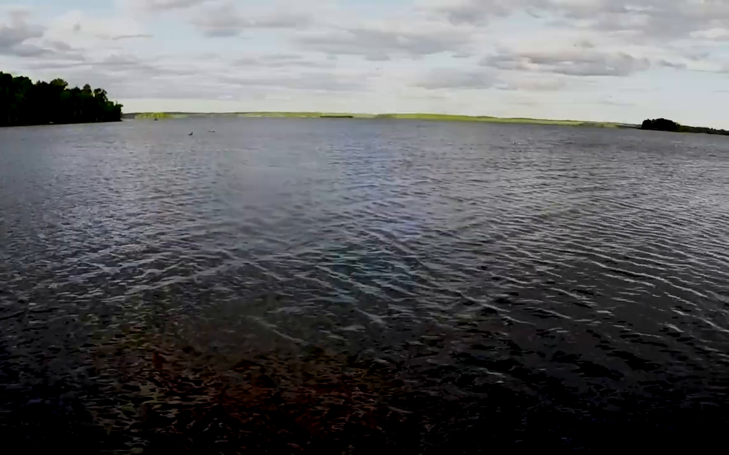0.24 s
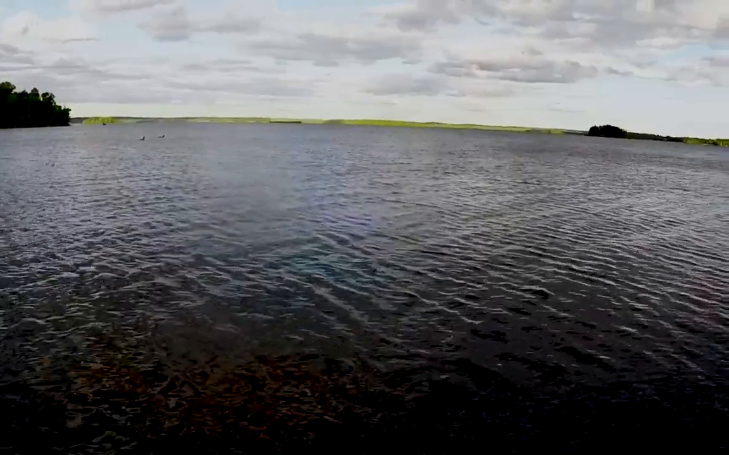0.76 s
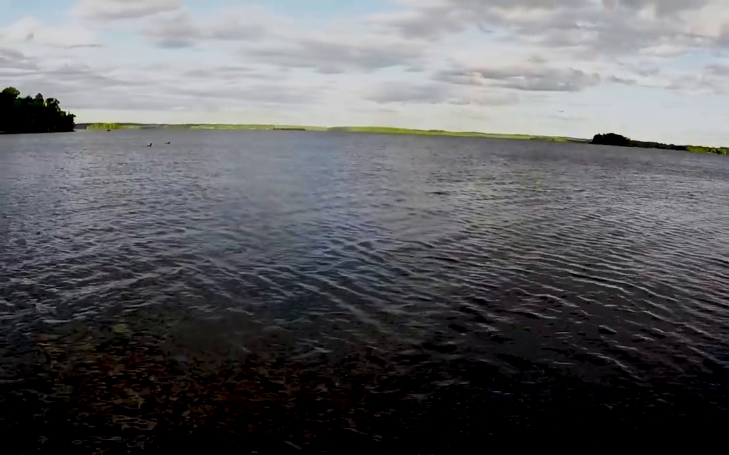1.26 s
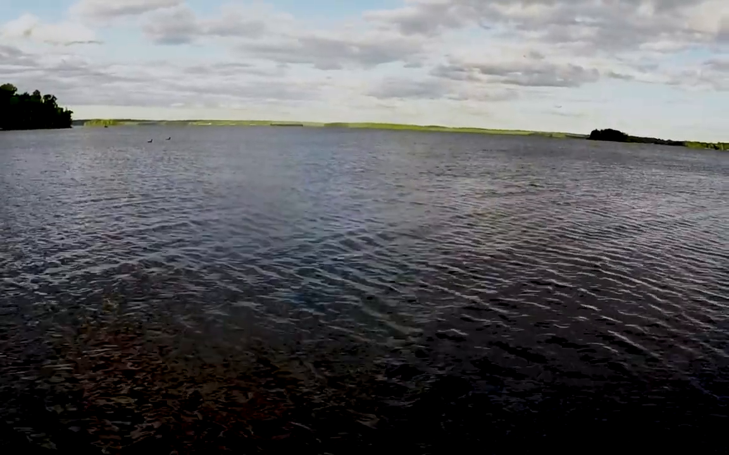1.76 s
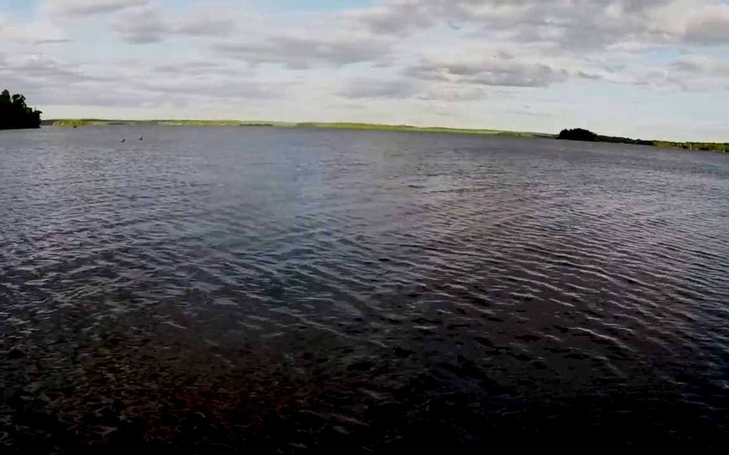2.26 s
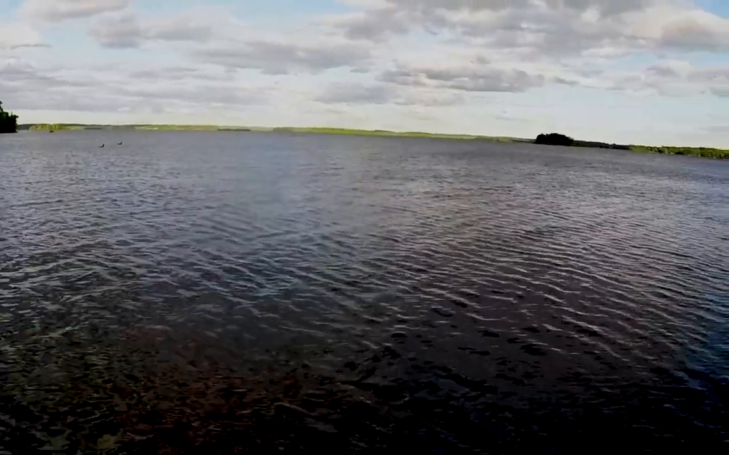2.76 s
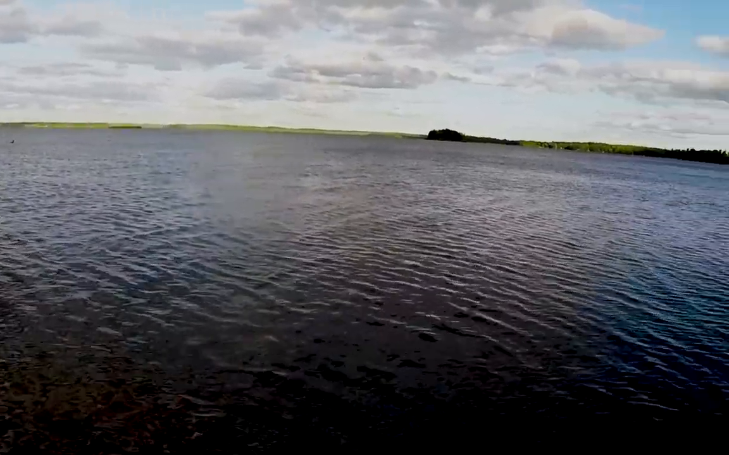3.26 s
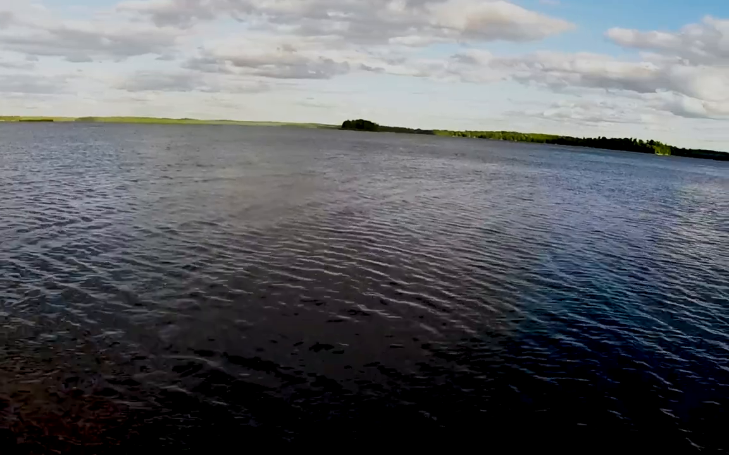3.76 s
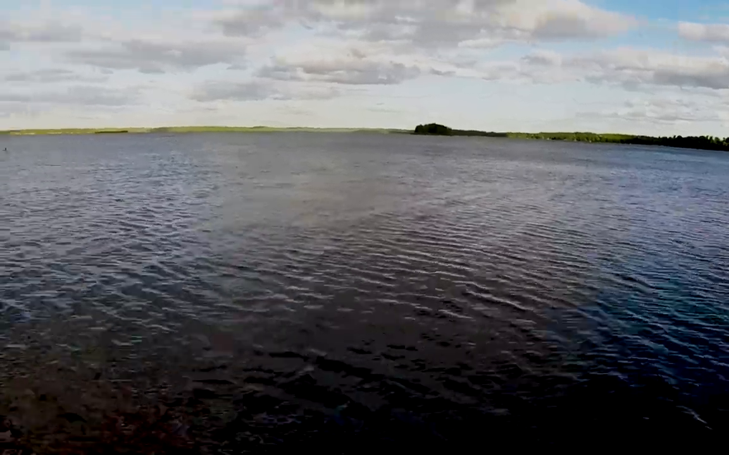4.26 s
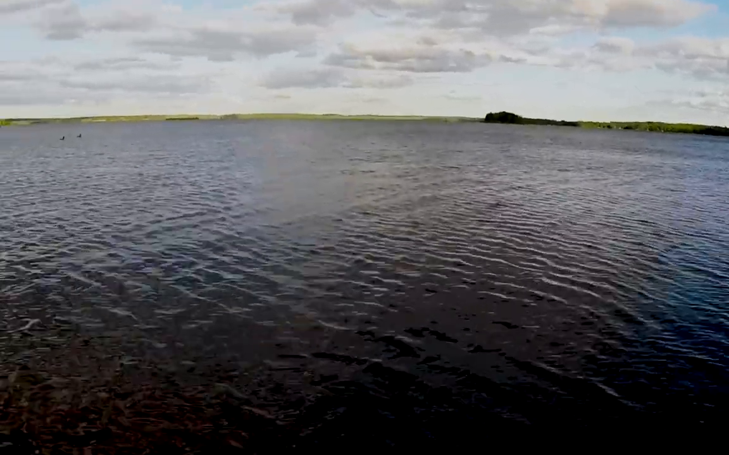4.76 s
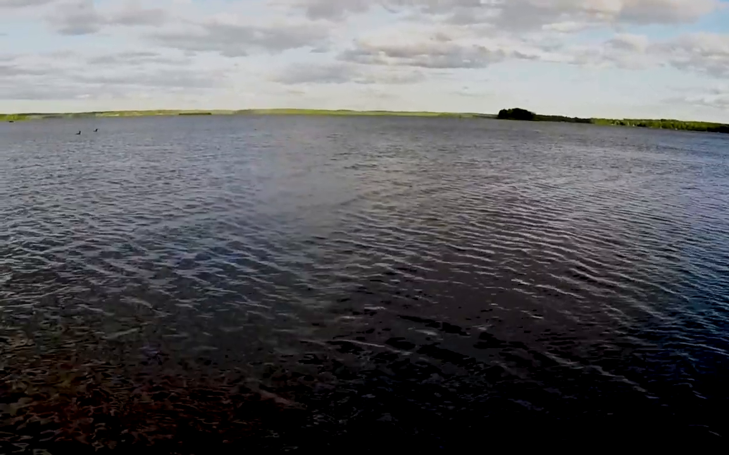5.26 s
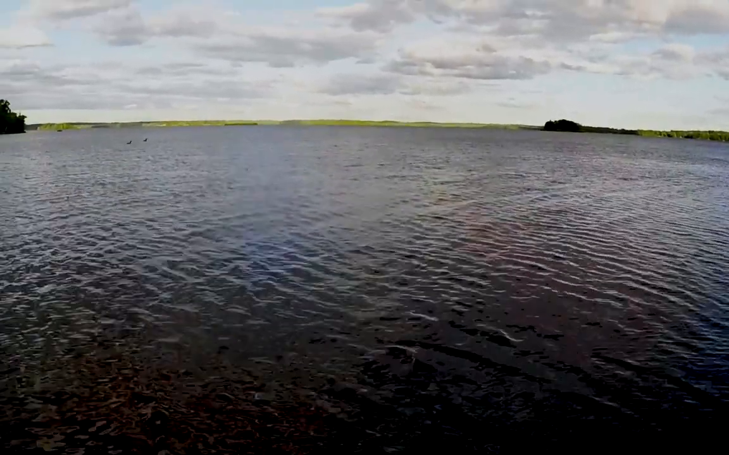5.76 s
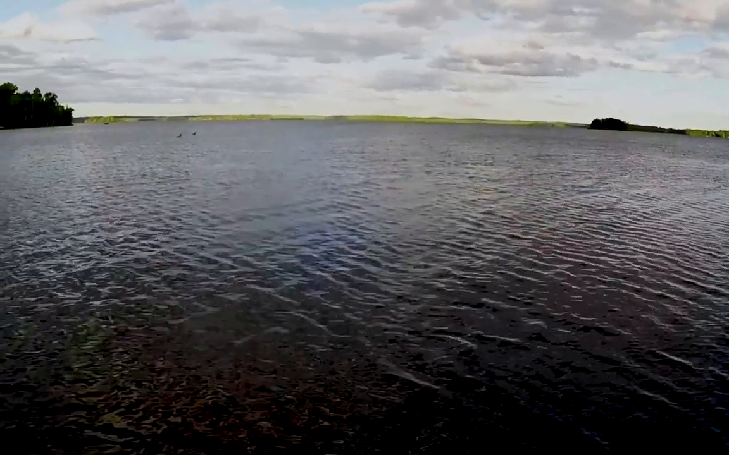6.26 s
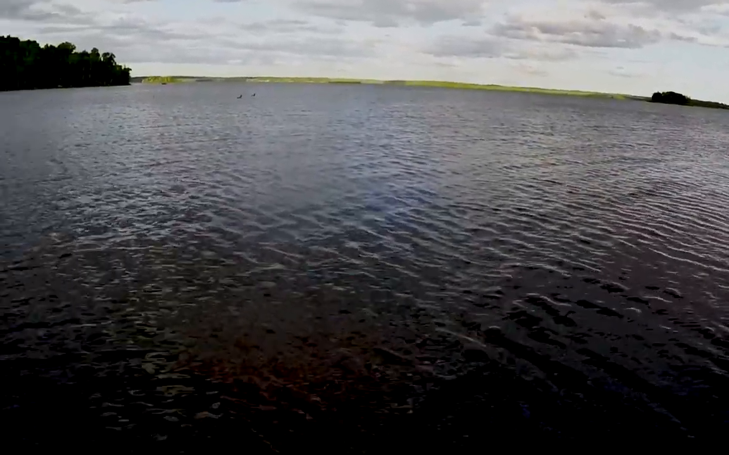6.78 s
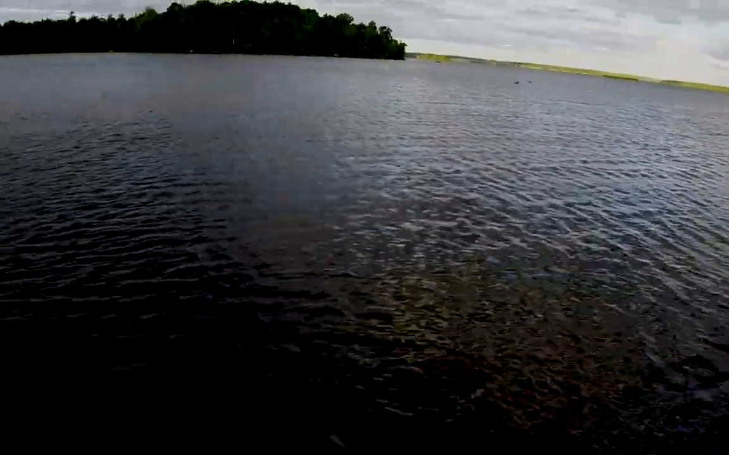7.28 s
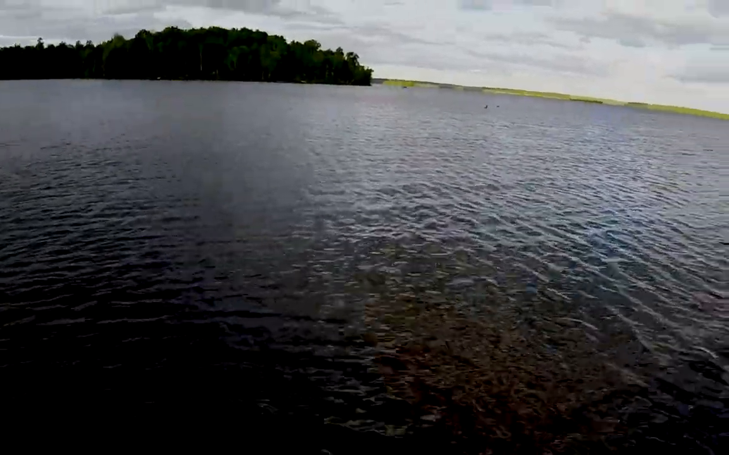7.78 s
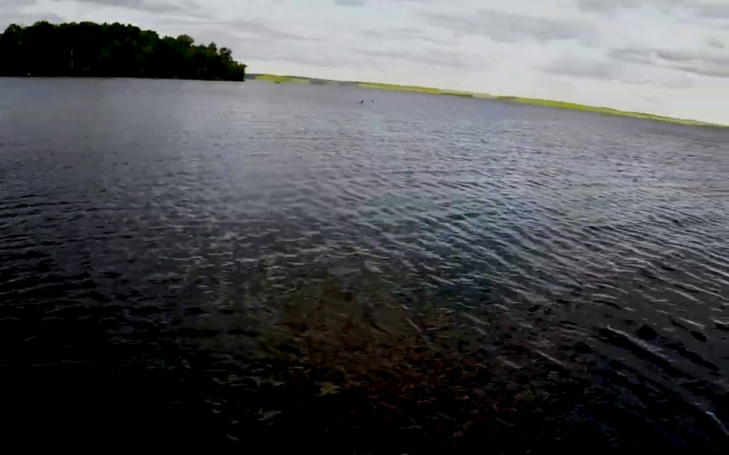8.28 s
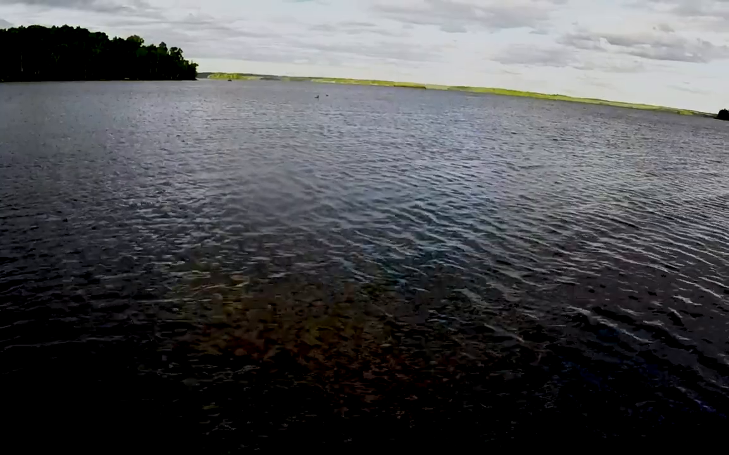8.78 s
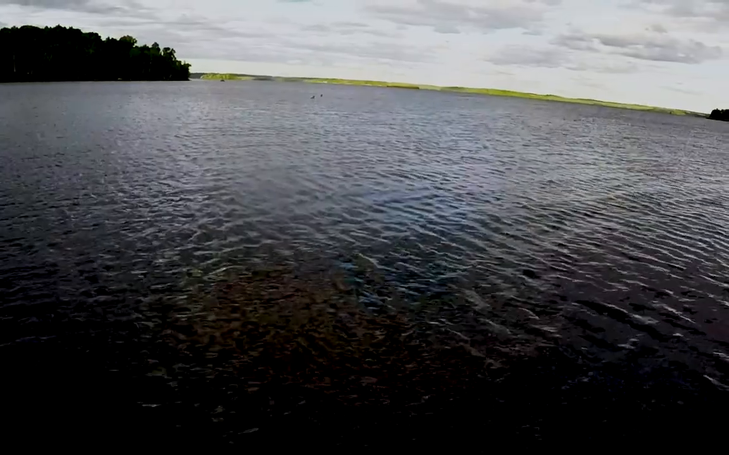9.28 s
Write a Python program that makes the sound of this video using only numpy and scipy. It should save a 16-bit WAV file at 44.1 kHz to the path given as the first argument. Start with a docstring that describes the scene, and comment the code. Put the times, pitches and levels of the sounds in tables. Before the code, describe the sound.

On an open lake, a loon gives a short, high wail, then two loons trade quavering, laugh-like cries, sometimes overlapping. Each cry scoops upward, warbles rapidly and falls away with a faint echo from the shores. Soft ripples lap beneath them, along with a very faint low drone. In the second half a gust rumbles against the microphone while the calls continue, and a few small clicks come near the end.

```python
"""A loon's high wail opens a duet across a lake. Each cry that follows scoops up in a low register,
breaks into a tremolo (pitch and level modulated together about ten times a second) and falls away.
The throat filters the harmonics, and scattering from the wooded shores adds a long reverberation.
Ripples ring trapped pockets of air; a turbulent gust buffets the microphone and rustles along the
shore. Far off are a faint drone and one small bird's whistle."""
import sys
import numpy as np
from scipy import signal
from scipy.fft import rfft, irfft, next_fast_len
from scipy.io import wavfile
from scipy.ndimage import map_coordinates

SR = 44100
rng = np.random.default_rng(int(sys.argv[2]) if len(sys.argv) > 2 else 0)


def digitize_waveform(pressure):
    """Quantize a signal to 16-bit integers and store it at the path in sys.argv[1].

    Rows of a 2-D input are taken as channels; values are limited to [-1, 1].
    """
    field = np.atleast_2d(pressure).T
    bounded = np.clip(field, -1, 1)
    quanta = np.round(bounded * 32767).astype(np.int16)
    wavfile.write(sys.argv[1], SR, quanta)


N = 420273
TIME = np.arange(N) / SR


# Tremolos: (register break [s], length [s], time to a crest [s], warble rate [Hz], crest pitch [Hz],
# sag [Hz], release [s], base level [dB], swell [dB], arch [dB], trough dip [dB], time to leap [s; 0 = none],
# leap gain [dB], trim of harmonic 2 [dB], of harmonic 3 [dB], of higher ones [dB])
TREMOLOS = [(0.529, 0.494, 0.106, 10.38, 1224, 246, 0.098, -20.9, 1.2, 2.4, 9.6, 0.0, 0.0, -1, -3, -2),
            (1.754, 0.448, 0.1, 11.47, 1233, 249, 0.162, -31.5, -9.1, 2.1, 9.0, 0.0, 0.0, 4, 0, 3),
            (1.945, 0.568, 0.08, 10.44, 1225, 228, 0.112, -27.9, 1.3, -0.1, 3.4, 0.0, 0.0, -3, -1, -3),
            (2.92, 0.53, 0.18, 11.34, 1226, 218, 0.082, -28.1, -7.7, 1.3, 11.8, 0.104, -1.4, -8, -10, -8),
            (3.299, 0.636, 0.088, 10.49, 1230, 192, 0.178, -23.0, -0.1, 1.9, 5.1, 0.0, 0.0, -7, -9, -9),
            (4.089, 0.542, 0.109, 11.49, 1212, 185, 0.075, -29.2, -5.5, 3.3, 15.0, 0.043, 2.2, -2, -1, -3),
            (4.604, 0.62, 0.052, 10.62, 1219, 167, 0.086, -27.4, 1.8, -2.5, 2.5, 0.0, 0.0, -5, 0, -1),
            (5.191, 0.564, 0.127, 11.31, 1205, 170, 0.07, -27.1, -2.6, 4.4, 15.9, 0.046, 2.2, 0, -3, -2),
            (5.934, 0.66, 0.079, 10.23, 1224, 194, 0.218, -21.6, 4.0, -0.8, 1.4, 0.0, 0.0, -1, -4, -4),
            (6.436, 0.459, 0.107, 11.41, 1217, 173, 0.075, -20.2, 3.4, 5.3, 12.2, 0.033, -5.9, -4, -1, -5),
            (7.225, 0.594, 0.106, 10.51, 1232, 168, 0.112, -25.2, -4.3, -0.7, 3.4, 0.0, 0.0, -2, -5, -4),
            (8.529, 0.654, 0.084, 10.36, 1230, 170, 0.097, -23.0, 1.2, 3.8, 5.2, 0.0, 0.0, -2, -4, -5),
            (9.105, 0.48, 0.086, 11.19, 1276, 230, 0.156, -25.9, -3.3, 3.8, 14.6, 0.159, -0.2, -8, -1, -6)]

def tremolo(onset, length, crest, rate, hz, sag_hz, release, db, swell_db, arch_db, dip_db,
            leap, leap_db, *colour_db):
    """Coupled frequency and amplitude modulation: pitch and level sag together on every warble."""
    i, gate = during(onset, onset + length)
    t = TIME[i] - onset
    age = np.maximum(t, 0)
    ending = np.clip(1 + (t - length) / release, 0, 1)
    spent = np.sin(np.pi / 2 * ending) ** 2  # in the release the voice steadies, sinks and dulls
    sag = warble(t, length, crest, rate) * (1 - spent)
    high = switch(t, leap) if leap > 0 else 0
    drift_hz = 16 * (t - length / 2)
    overshoot_hz = 90 * np.exp(-age / .006)  # the voice lands sharp after the break
    leap_ratio = 1.169
    pitch = (hz + drift_hz - sag_hz * sag - 244 * spent) * leap_ratio ** high + overshoot_hz
    dip = dip_db * sag * (.75 ** (1 - high) if leap > 0 else 1)  # shallower before a leap
    from_middle = t / length - .5
    contour_db = swell_db * from_middle - arch_db * (2 * from_middle) ** 2
    attack_db, release_db = 27.6 * np.exp(-age / .0058), 12.9 * ending ** 2
    level = db + contour_db - attack_db - release_db + leap_db * high - dip
    colour = [trim - 5 * spent for trim in colour_db]
    return i, gate * falter(high) * amp(level) * syrinx(pitch, colour, dip, sag)


# Lead-in to each tremolo: (length [s], base pitch [Hz], base level [dB], swell [dB], overtone trim [dB])
LEAD_INS = [(0.145, 803, -30.4, 3.1, 1), (0.09, 817, -37.3, -2.8, 5), (0.101, 768, -31.9, 5.0, 0),
            (0.045, 737, -37.5, 9.1, 5), (0.125, 767, -34.0, 5.8, 3), (0.074, 760, -35.1, 3.3, 0),
            (0.07, 738, -32.8, 4.5, 9), (0.052, 753, -31.4, 1.0, -1), (0.067, 743, -30.8, 2.8, 6),
            (0.072, 747, -32.6, 5.8, -3), (0.102, 761, -31.1, 2.1, 6), (0.126, 753, -33.2, 2.9, 6),
            (0.056, 812, -37.4, 1.1, 1)]

def scoop(cry, lead, hz, db, swell_db, overtone_db):
    """Upward glide: the low register, modulated in time with its cry, brightens until the voice breaks."""
    onset, length, crest, rate, _, sag_hz, *_ = cry
    i, gate = during(onset - lead, onset)
    t = TIME[i] - onset
    sag = warble(t, length, crest, rate)
    start = np.exp(-np.maximum(t + lead, 0) / .014)  # begins flat and soft
    push = np.exp(np.minimum(t, 0) / .0346)  # last climb to the break
    pitch = hz - .47 * sag_hz * sag - 50 * start + 125 * push
    level = db + swell_db * (t / lead + .5) - 3.3 * sag - 3.3 * start
    bright_db = overtone_db + 5 * (push - .5)
    return i, gate * amp(level) * syrinx(pitch, [bright_db, bright_db - 3, bright_db + 4])


# Opening wail: (time [s], upper-register pitch [Hz], level [dB], overtone trim [dB])
WAIL_CONTOUR = [(0, 1715, -30, 6), (.06, 1675, -36, 6), (.125, 1610, -32.5, 0), (.2, 1572, -32.5, -3),
                (.252, 1665, -30.5, -4), (.28, 1678, -26, -4), (.33, 1712, -26.5, -3),
                (.4, 1785, -25.5, -2), (.432, 1717, -32, -2)]

def wail(slip_s=.122, return_s=.256, slip_ratio=.897):
    """Register shift: one high note slips down by a fixed frequency ratio and returns."""
    times, hz, db, overtone_db = np.transpose(WAIL_CONTOUR)
    i, gate = during(times[0], times[-1])
    t = TIME[i]
    knot = np.interp(t, times, np.arange(len(times)))
    pitch = map_coordinates(hz, [knot], order=3, mode="nearest")
    low = switch(t, slip_s) - switch(t, return_s)
    tone = syrinx(pitch * slip_ratio ** low, [np.interp(t, times, overtone_db)])
    return i, gate * falter(low) * amp(np.interp(t, times, db)) * tone


# Low notes after cries: (time [s], length [s], starting level [dB], pitch change [Hz])
CLOSING_NOTES = [(1.03, .06, -41, -58), (2.222, .028, -38.5, 230), (2.515, .06, -40, -56),
                 (3.45, .022, -45, -45), (5.226, .049, -42, -56), (5.765, .025, -43, -45),
                 (6.598, .032, -40, -70), (6.9, .065, -40.5, -46), (7.823, .062, -41, -63),
                 (9.185, .035, -46, -65)]

def drop(onset, length, db, change_hz, hz=678, fade_db=5.5):
    """Linear glide: a soft note slides and fades as the voice falls out of a cry."""
    i, gate = during(onset, onset + length)
    progress = (TIME[i] - onset) / length
    return i, gate * amp(db - fade_db * progress) * syrinx(hz + change_hz * progress, [-8])


# Creaks before cries: (time [s], length [s], final level [dB])
VOICE_ONSETS = [(.328, .052, -49), (1.81, .03, -49), (3.1, .065, -51), (5.83, .038, -50), (7.1, .022, -48),
                (8.38, .023, -49)]

def creak(onset, length, db, hz=345, rise_hz=155, swell_db=8):
    """Onset of phonation: a short, reedy tone rises and swells."""
    i, gate = during(onset, onset + length)
    progress = (TIME[i] - onset) / length
    return i, gate * amp(db - swell_db * (1 - progress)) * syrinx(hz + rise_hz * progress, [1.5])


def loons():
    """Superposition: the notes of the two birds overlap and add."""
    notes = [wail()] + [creak(*row) for row in VOICE_ONSETS]
    notes += [scoop(cry, *row) for cry, row in zip(TREMOLOS, LEAD_INS)]
    notes += [tremolo(*cry) for cry in TREMOLOS] + [drop(*row) for row in CLOSING_NOTES]
    out = np.zeros(N)
    for i, note in notes:
        out[i] += note
    return out


# Resonances of throat and bill: (frequency [Hz], gain [dB])
VOCAL_TRACT = [(400, -6), (800, 3.5), (1600, -4), (2000, -21), (2450, -24), (2830, -26), (3100, -38.5),
               (3650, -30.5), (3900, -46.5), (4230, -35), (4450, -48), (5050, -32), (5400, -35.5),
               (5900, -50.5), (7200, -43.5), (9000, -67.5)]
# Source harmonics 2-7: (relative level [dB], gain per dB of dip [dB/dB], gain in a trough [dB])
HARMONICS = [(-5.5, -.55, -4), (-5.5, -.25, -4), (-9, 1.6, -6), (-11, .4, -2), (-10, .5, -1),
             (-12.5, -2, -1)]

def syrinx(pitch, colour_db, dip_db=0, sag=0, flicker_db=1.8, jitter=.002, shimmer_db=.65):
    """Source-filter model: the harmonics of an unsteady tone sweep through the tract's resonances."""
    size = len(pitch)
    phase = 2 * np.pi * np.cumsum(pitch * (1 + jitter * wobble(250, size))) / SR
    tone = np.sin(phase)
    for k, (db, per_dip, trough_db) in enumerate(HARMONICS):
        multiple = k + 2
        trim_db = colour_db[min(k, len(colour_db) - 1)]  # the last trim serves all higher harmonics
        tract_db = along(VOCAL_TRACT, multiple * pitch) - along(VOCAL_TRACT, pitch)
        level = trim_db + db + per_dip * dip_db + trough_db * sag + tract_db
        tone += amp(level + flicker_db * wobble(25, size)) * np.sin(multiple * phase)
    return np.sqrt(2) * tone * amp(shimmer_db * wobble(70, size))


def warble(t, length, crest, rate, slowing=.99, tire_s=.081, roundness=1.27):
    """Modulator: 0 on a round crest, 1 in a sharp trough, slowing as the breath runs out."""
    lag = lambda t: slowing * tire_s * np.exp(np.minimum(t - length, 0) / tire_s)
    return 1 - np.abs(np.cos(np.pi * rate * (t - crest - lag(t) + lag(crest)))) ** roundness


def switch(t, when, width_s=.002):
    """Register transition: a smooth step from 0 to 1."""
    return .5 + .5 * np.tanh((t - when) / width_s)


def falter(register):
    """Oscillation weakens to half amplitude between two registers."""
    return 1 - .5 * np.sin(np.pi * register)


# Decay of the shore echo: (frequency [Hz], reverberation time T60 [s])
SHORE_DECAY = [(300, 1.2), (1200, 1.3), (1750, 1.8), (3000, 0.41), (8000, 0.14)]

def shores(x, delay_s=.069, build_s=.6):
    """Diffuse scattering: the far woods return a tail that arrives late and builds slowly."""
    hz, t, spectra = signal.stft(rng.standard_normal(3 * SR), SR, nperseg=256)
    arrival = 1 - np.exp(-np.maximum(t - delay_s, 0) / build_s)
    decay = amp(-60 * t / along(SHORE_DECAY, hz)[:, None])
    tail = signal.istft(spectra * decay * arrival, SR, nperseg=256)[1]
    return signal.fftconvolve(x, tail / np.linalg.norm(tail))[:N]


# Breeze: (time [s], buffet level [dB], flutter level [dB])
BREEZE = [(0, -62, -60), (2.5, -60, -57.5), (4.5, -60, -61), (4.85, -52, -62), (5.1, -56, -61),
          (5.35, -43, -60), (6.1, -39, -53), (6.5, -38, -43), (6.9, -26.5, -35), (7.4, -33, -43),
          (7.85, -40, -48), (8.25, -42, -58), (8.7, -36, -53), (9.05, -43, -53), (9.2, -55, -57),
          (9.53, -57, -58)]
# Puffs added to it: (time [s], half length [s], buffet level [dB], flutter level [dB])
WIND_PUFFS = [(.62, .14, -54, -67), (5.73, .07, -29.5, -39), (6.29, .08, -36, -39), (6.68, .11, -32, -34),
              (7.08, .09, -32, -40), (7.66, .1, -40, -42), (8.03, .08, -37, -42), (8.41, .05, -47, -43),
              (9.02, .075, -29.5, -37)]
# Spectra of the eddies: (frequency [Hz], relative density [dB])
BUFFET_SPECTRUM = [(12, -14.5), (25, -1.5), (48, 1), (70, -6.5), (110, -24.5), (300, -69), (1000, -120)]
FLUTTER_SPECTRUM = [(40, -24.5), (75, 0), (120, -2), (180, -13.5), (300, -23), (700, -42.5), (2000, -70.5),
                    (6000, -120)]

def wind(lump_db=2.3, eddy_rate=22):
    """Turbulent pressure: eddies at the microphone make a deep buffeting and a flutter above it."""
    times, *levels_db = np.transpose(BREEZE)
    strength = amp([np.interp(TIME, times, db) for db in levels_db])
    for centre, half_length, buffet_db, flutter_db in WIND_PUFFS:
        strength += amp([[buffet_db], [flutter_db]]) * swell(centre, half_length)
    eddies = [unit(amp(lump_db * np.tanh(wobble(eddy_rate))) * noise(spectrum))
              for spectrum in (BUFFET_SPECTRUM, FLUTTER_SPECTRUM)]
    return np.sum(strength * eddies, axis=0)


# Wash of the lake: (frequency [Hz], relative density [dB])
WASH_SPECTRUM = [(60, -11.5), (120, -5), (210, -4), (310, -6), (500, -7.5), (800, -10), (1600, -17),
                 (2500, -21.5), (4000, -27.5), (6300, -30.5), (10000, -32), (15300, -33)]
# Ripples at the shore: (time [s], level [dB], pitch [Hz], decay by 17 dB [cycles])
RIPPLES = [(.776, -34.5, 406, 10), (2.248, -34.5, 290, 4.8), (2.61, -28, 401, 2.5), (2.614, -31.5, 217, 5),
           (2.676, -35.5, 130, 7.8), (2.7, -38, 136, 7.3), (2.819, -36, 295, 7), (2.833, -35.5, 221, 10),
           (3.182, -36, 215, 11), (4.116, -34, 198, 4.5), (4.153, -38.5, 174, 11), (4.225, -38, 264, 9),
           (4.595, -37, 215, 12), (5.407, -35.5, 313, 11), (5.44, -38.5, 225, 7.3), (9.2, -37, 165, 7.8),
           (9.46, -33, 735, 3.6)]

def water(wash_db=-53.5, slosh_rad=.48, count=9, small_db=-45, small_hz=250, small_cycles=9):
    """Bubble resonance: over a steady wash, each lap traps air that rings as a damped oscillator."""
    out = amp(wash_db) * noise(WASH_SPECTRUM)
    t = np.arange(SR // 4) / SR
    small = [(when * TIME[-1], small_db, small_hz * np.exp(.3 * (2 * tuning - 1)), small_cycles)
             for when, tuning in rng.random((count, 2))]
    for onset, db, hz, cycles in RIPPLES + small:
        ring = np.sin(2 * np.pi * hz * t + slosh_rad * wobble(hz, len(t)))
        pocket = ring * np.exp(-2 * hz * t / cycles) * (1 - np.exp(-2 * hz * t))
        i = round(onset * SR)
        out[i:i + len(t)] += (amp(db) * pocket)[:N - i]
    return out


# Rustles in the gust: (time [s], level [dB], half length [s])
GUST_RUSTLES = [(3.835, -66.5, 0.077), (5.827, -64, 0.19), (6.219, -65, 0.1), (6.719, -60.5, 0.17),
                (6.873, -65.5, 0.091), (7.466, -60.5, .06), (7.655, -64, .065), (7.945, -68, 0.068)]
# Clicks close by: (time [s], level [dB])
CLICKS = [(6.833, -50.5), (9.091, -41), (9.459, -40.5), (9.503, -47.5)]
# Their spectra: (frequency [Hz], relative density [dB])
RUSTLE_SPECTRUM = [(800, -23.5), (2000, -3), (3500, -1.5), (5400, -0.5), (6500, -3.5), (9000, -13),
                   (15000, -23)]
CLICK_SPECTRUM = [(200, -7), (700, 2.5), (2500, 2), (5000, -19.5), (12000, -26)]

def rustles(grain_db=2.5, click_t60=.022):
    """Amplitude-modulated noise: grainy swells rustle, and fast exponential decays click."""
    strokes = sum(amp(db) * swell(centre, half_length) for centre, db, half_length in GUST_RUSTLES)
    clicks = sum(amp(db - 60 * np.clip((TIME - onset) / click_t60, 0, 2)) * (TIME >= onset)
                 for onset, db in CLICKS)
    grains = unit(noise(RUSTLE_SPECTRUM) * amp(grain_db * wobble(300)))
    return strokes * grains + clicks * noise(CLICK_SPECTRUM)


# Far drone: (frequency [Hz], level [dB])
DRONE_TONES = [(89, -60.5), (181, -63.5), (208, -65)]

def drone(unsteady=.013):
    """Random modulation: faint low tones wander in pitch and strength."""
    out = np.zeros(N)
    for hz, db in DRONE_TONES:
        gain = np.sqrt(2) * amp(db + .89 * wobble(4.6))
        pitch = hz * (1 + unsteady * wobble(14))
        out += gain * np.sin(2 * np.pi * np.cumsum(pitch) / SR)
    return out


# A small bird far off: (time [s], pitch [Hz], level [dB])
WHISTLE_CONTOUR = [(1.41, 3250, -72), (1.47, 3080, -63), (1.53, 3090, -70), (1.58, 3420, -66),
                   (1.639, 3950, -73)]

def songbird():
    """Pure-tone glide: one thin whistle sinks and rises."""
    times, hz, db = np.transpose(WHISTLE_CONTOUR)
    i, gate = during(times[0], times[-1])
    phase = 2 * np.pi * np.cumsum(np.interp(TIME[i], times, hz)) / SR
    out = np.zeros(N)
    out[i] = gate * amp(np.interp(TIME[i], times, db)) * np.sin(phase)
    return out


def amp(db):
    """Decibels to amplitude ratio."""
    return 10 ** (np.asarray(db) / 20)


def unit(x):
    """Normalisation to rms 1."""
    return x / np.sqrt(np.mean(x ** 2) + 1e-20)


def along(points, hz):
    """Interpolation on a log-frequency axis."""
    frequencies, values = np.transpose(points)
    return np.interp(np.log(hz + 1), np.log(frequencies + 1), values)


def wobble(rate, size=N):
    """Smooth random modulator, rate knots a second."""
    return map_coordinates(rng.standard_normal(int(size * rate / SR) + 4), [TIME[:size] * rate], order=2)


def filtered(x, response):
    """Filtering by multiplication of the spectrum."""
    size = next_fast_len(N + 8192)
    return irfft(rfft(x, size) * response(np.fft.rfftfreq(size, 1 / SR)), size)[:N]


def noise(spectrum):
    """Coloured noise of rms 1."""
    return unit(filtered(rng.standard_normal(N), lambda hz: amp(along(spectrum, hz))))


def during(start, end, fade=.007):
    """Tapered window: a note's sample indices and gate."""
    start, end = start - fade / 3, end + fade / 3
    i = np.flatnonzero((TIME > start) & (TIME < end))
    to_edge = np.minimum(TIME[i] - start, end - TIME[i])
    return i, np.sin(np.pi / 2 * np.clip(to_edge / fade, 0, 1))


def swell(centre, half_length):
    """Gaussian envelope."""
    return np.exp(-2 * np.minimum(((TIME - centre) / half_length) ** 2, 20))


def scene(echo_db=-35):
    """Superposition of the direct cries, their reverberation and the background."""
    birds = loons()
    return (birds + amp(echo_db) * shores(birds) + songbird() + wind() + water() + drone() + rustles())[None]


def record(dry, top_hz=15400):
    """Band limiting by an ideal low-pass filter."""
    return filtered(dry[0], lambda hz: hz < top_hz)[None]


dry = scene()
out = record(dry)
digitize_waveform(out)
```